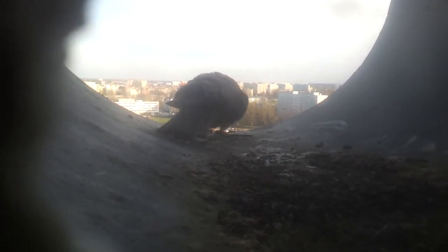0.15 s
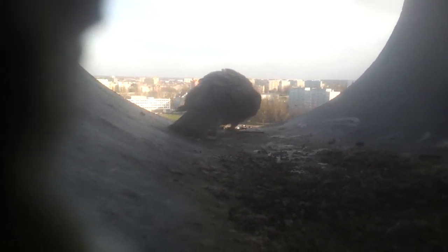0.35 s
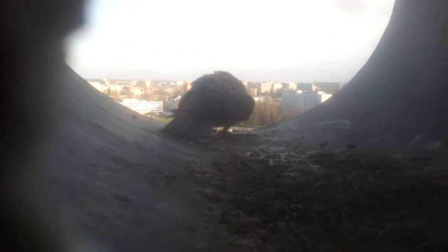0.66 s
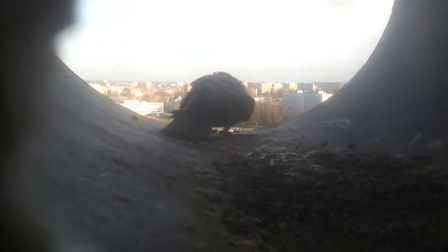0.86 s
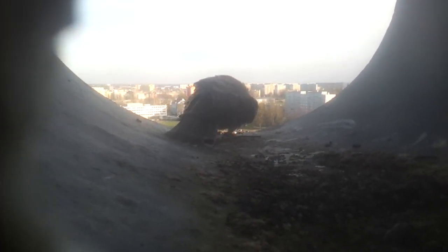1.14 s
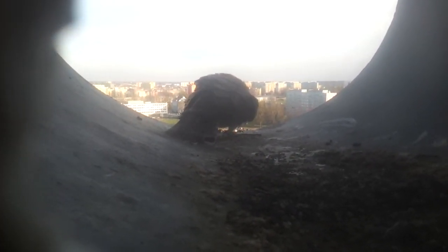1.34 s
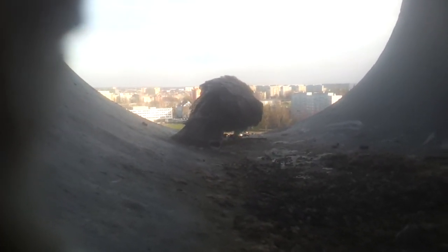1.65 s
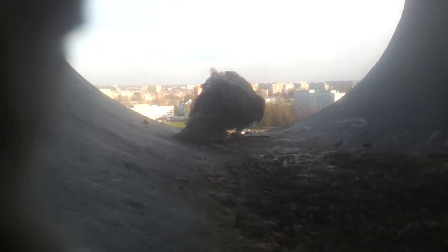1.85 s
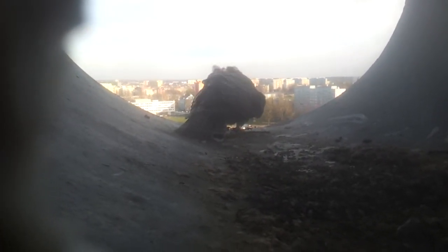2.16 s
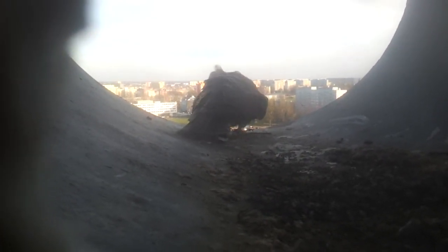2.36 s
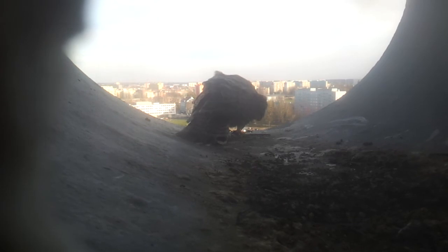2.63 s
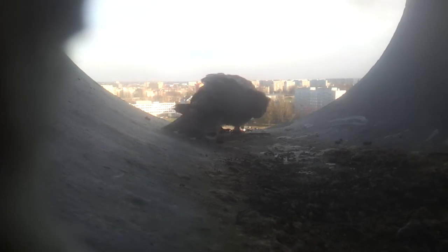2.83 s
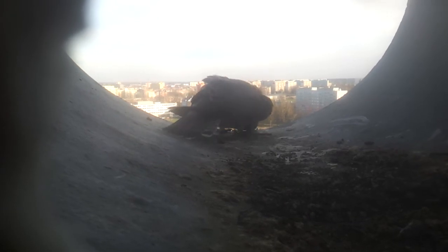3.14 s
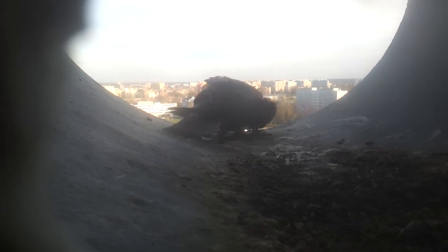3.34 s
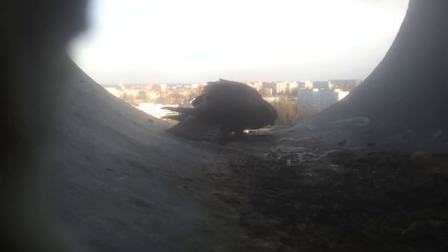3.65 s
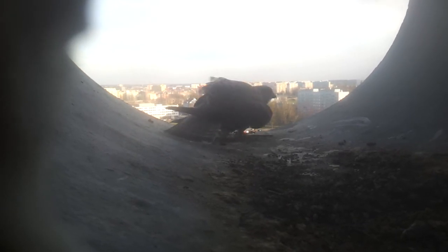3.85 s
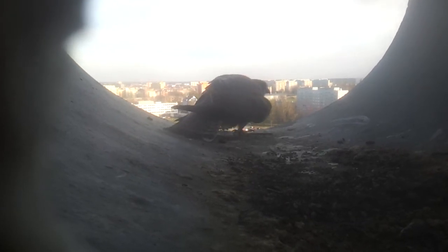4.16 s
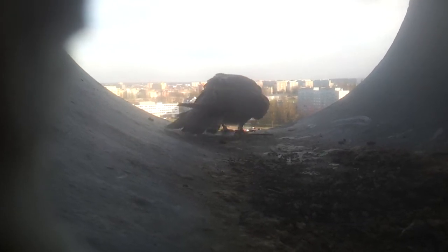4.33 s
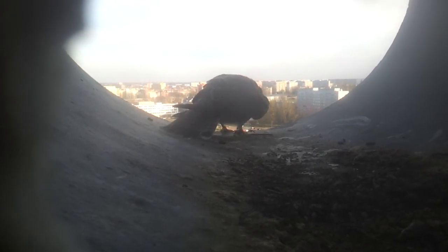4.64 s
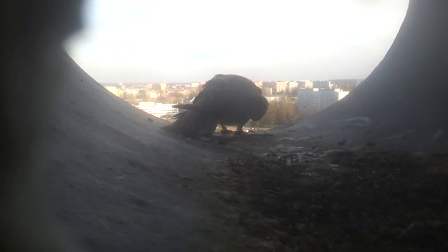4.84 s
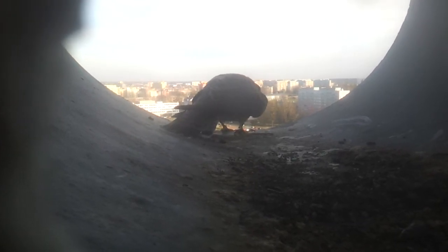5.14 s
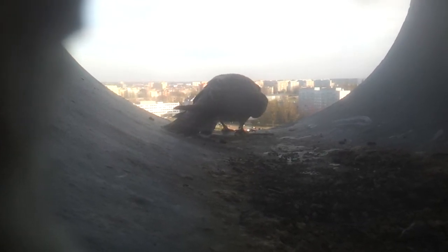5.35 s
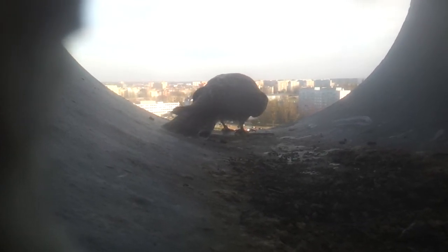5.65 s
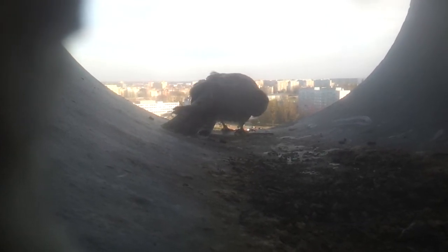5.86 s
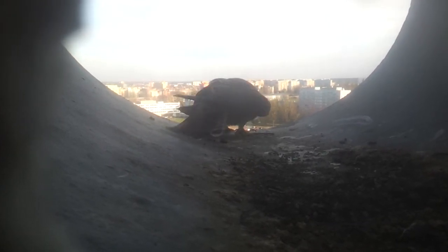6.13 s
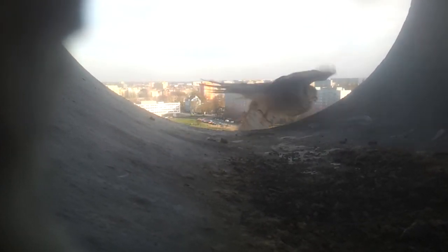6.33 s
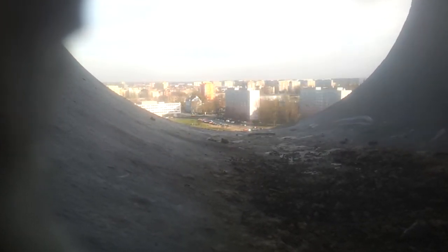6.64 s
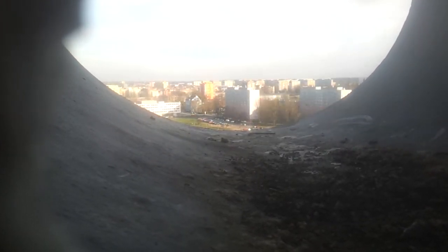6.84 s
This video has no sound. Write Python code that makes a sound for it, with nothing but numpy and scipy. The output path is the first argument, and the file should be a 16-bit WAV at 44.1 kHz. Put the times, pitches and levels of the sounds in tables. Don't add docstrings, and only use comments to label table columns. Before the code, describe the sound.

Inside a concrete pipe high over a town, steady muffled traffic rumble, a deep faint hum and light microphone hiss run throughout. A tiny dry grit tick comes at 0.2 s and a weak chirp near 0.6 s. A nearby kestrel then gives shrill, quavering trills of about seventeen notes a second, each note leaping up and sagging: calls at 0.7-1.1, 1.3-1.7, 1.8-2.2 and 2.4-2.7 s, growing stronger, then a lone chirp near 2.9 s. Thin whistles from another bird far off sound around 0.7 and 2.7 s. Only the rumble and a barely audible tick at 3.4 s fill the pause. The second, louder run opens with a long swelling trill at 4.3-4.8 s, followed by calls at 4.9-5.3 and 5.4-5.7 s, a more irregular one at 6.1-6.5 s, and a fainter last trill from 6.7 s to the end. Pipe and buildings return short, bright echoes.

```python
import sys
import numpy as np
from scipy import signal
from scipy.fft import rfft, irfft, next_fast_len
from scipy.io import wavfile
from scipy.ndimage import uniform_filter1d, minimum_filter1d, map_coordinates

SR = 44100
rng = np.random.default_rng(int(sys.argv[2]) if len(sys.argv) > 2 else 0)


def gain_from_db(level_db):
    decades = np.asarray(level_db, float) / 20
    return 10 ** decades


def materialize(psi):
    bounded = np.clip(np.atleast_2d(psi).T, -1, 1)
    quanta = np.round(bounded * 32767).astype(np.int16)
    wavfile.write(sys.argv[1], SR, quanta)


N = 308259

# frequency in Hz, density in dB per Hz.
DRONE_COLOUR = [(12, -57), (20, -22), (31, -7), (43, -4.5), (59, 1.5), (75, -5.5), (85, -18), (110, -15),
                (190, -120)]
RUMBLE_COLOUR = [(41, -21), (70, -2), (76, -3), (102, 2), (124, -4.5), (189, -5.5), (221, -5), (237, -15),
                 (253, -12), (290, -13.5), (380, -25), (640, -120)]
TRAFFIC_COLOUR = [(150, -33), (250, -3.5), (306, -11), (352, 4.5), (379, -5.5), (459, 0), (500, -5.5),
                  (600, -2.5), (742, -5.5), (919, 0.5), (1670, -7), (1960, -11), (3200, -21), (4160, -70),
                  (7040, -120)]
HISS_COLOUR = [(1470, -5.5), (2500, -8.5), (3240, -5.5), (4040, -1.5), (4790, -4), (5940, -3.5),
               (14600, -8)]
SHAKE_COLOUR = [(14, -25), (24, -10), (32, 13), (42, -13), (80, -120)]
# time in seconds, level in dB.
TRAFFIC_FLOW = [(0, -48), (1.9, -46.5), (3, -48), (4.5, -48.5), (6.99, -51)]
# frequency in Hz, left-right likeness from -1 to 1.
STEREO_LIKENESS = [(60, 0.91), (130, 0.98), (290, 0.87), (620, 0.65), (1360, -0.37), (2980, 0.031),
                   (6500, -0.34), (14200, -0.27)]
# frequency in Hz, left over right in dB.
STEREO_LEAN = [(60, 5.5), (110, 3.5), (200, 3), (370, 2), (680, -0.5), (1250, -2.5), (2300, 0.5),
               (4210, 0.5), (7740, -1), (14200, 0.5)]
# frequency in Hz, level in dB.
MACHINE_HUM = (45, -53)
# frequency in Hz, time to fall by 60 dB in seconds.
WALL_DECAY = [(1500, 0.57), (3500, 0.57), (7000, 0.44), (12000, 0.67)]
# time in seconds, peak in dB.
GRIT_TICKS = [
    (0.2278, -27),
    (3.3994, -43),
]
# time in seconds, pitch in Hz, level in dB.
FAR_WHISTLES = [
    [(2.698, 2420, -32), (2.73, 2330, -44), (2.77, 2240, -47), (2.81, 2270, -56), (2.85, 2090, -46),
     (2.865, 2150, -56)],
    [(.755, 3600, -51), (.78, 3630, -42), (.815, 3500, -55)],
    [(.655, 4850, -65), (.677, 4500, -45), (.695, 4380, -60)],
]
# multiple of the pitch, level in dB.
UPPER_PARTIALS = [(3, -4.5), (4, -4), (5, -18), (6, -32.5), (7, -33), (8, -58)]
# frequency in Hz, gain in dB.
THROAT_COLOUR = [(4000, 1), (4700, 3.5), (5400, 0), (5900, -7), (6600, 4.5), (7200, 0.5), (8000, 0.5),
                 (12000, 2)]
# pitch in Hz, level in dB.
FUNDAMENTAL_COLOUR = [(1360, 8), (1470, -11), (1580, 1), (1660, -8.5), (1750, -9.5), (1850, -12.5)]
# opening note, first beat, last beat and end in seconds,
# beak turned (left over right) in dB.
CALL_TIMES = [(0.72, 0.775, 1.06, 1.11, -2), (1.293, 1.366, 1.6, 1.66, -1.5),
              (1.8, 1.83, 2.052, 2.174, -0.5), (2.414, 2.449, 2.62, 2.712, -0.5),
              (4.265, 4.311, 4.711, 4.764, -3), (4.915, 4.984, 5.218, 5.277, -2.5),
              (5.423, 5.486, 5.66, 5.73, -2.5), (6.138, 6.194, 6.246, 6.52, -2),
              (6.69, 6.756, 6.927, 6.984, -0.5)]
# opening pitch and top pitch in Hz, opening level and top
# level in dB, pace of the build in notes.
CALL_BUILDS = [(1509.5, 1725, -40.5, -31.5, 2.52), (1583, 1790, -46, -30, 1.57),
               (1608, 1840, -46, -26.5, 1.84), (1522, 1750, -42.5, -27, 1.78),
               (1410, 1800, -47.5, -19, 3.68), (1699, 1840, -32, -20, 4.3), (1724, 1772, -27.5, -22, 3.36),
               (1480, 1590, -46, -37.5, 0.76), (1500, 1730, -51, -40, 0.726)]
# share of pitch lost in early notes, share lost in late notes,
# upper partials in dB, fundamental in dB.
CALL_VOICES = [(.09, 0.052, 2, 0), (0.074, 0.083, -0.5, -2), (0.07, 0.08, -2, -1),
               (0.052, 0.0613, -3.5, -1), (0.062, 0.009, 1.5, 4), (0.099, 0.075, 0, 3.5),
               (0.0346, 0.0444, -2.5, -1), (.04, 0.075, 4, 1), (0.042, .045, -3.5, -6)]
# start in seconds, held pitch and sagged pitch in Hz,
# level in dB, upper partials in dB.
STRAY_NOTES = [(0.556, 1387, 1400, -54.5, 3), (0.679, 1730, 1490, -42, -5), (.947, 1545, 1480, -33.5, -1),
               (2.108, 1948, 2030, -23, -14), (2.133, 1813, 1530, -26.5, -1.5),
               (2.689, 1530, 1344, -28, -2), (2.858, 1540, 1450, -24, -6), (2.873, 1750, 1790, -34.5, -9),
               (2.883, 1616, 1410, -35.5, -4), (4.238, 1480, 1410, -65, -9), (6.3, 1534, 1520, -21.5, -1),
               (6.33, 1587, 1550, -33.5, 3), (6.392, 1613, 1592, -29.5, -1), (6.441, 1628, 1330, -33, -5.5)]
# end in seconds, beak turned (left over right) in dB.
LONE_CHIRPS = [
    (.61, 5),
    (2.91, -1.5),
]

BEAT_S = 0.057
FLUTTER_DB = 2.4


def unit(x):
    return x / np.sqrt(np.mean(x ** 2) + 1e-20)


def to_db(power):
    return 10 * np.log10(np.abs(power) + 1e-20)


def along(points, hz):
    f, v = np.transpose(points)
    return np.interp(np.log(hz + 1), np.log(f + 1), v)


def wobble(rate, size=N):
    knots = rng.standard_normal(int(size * rate / SR) + 4)
    return map_coordinates(knots, [np.arange(size) * rate / SR])


def glide(hz):
    return 2 * np.pi * np.cumsum(hz, axis=-1) / SR


def add(track, sound, s):
    part = track[:, round(s * SR):][:, :sound.shape[1]]
    part += sound[:, :part.shape[1]]


def rush(colour, patchy_db):
    z = signal.stft(rng.standard_normal((2, N + SR)), nperseg=512)[2]
    patches = uniform_filter1d(rng.standard_normal(z.shape[1:]), size=5, axis=0)
    patches = uniform_filter1d(patches, size=12, axis=1)
    noise = signal.istft(z * gain_from_db(patchy_db * unit(patches)), nperseg=512)[1]
    size = next_fast_len(N + SR // 2)
    hz = np.fft.rfftfreq(size, 1 / SR)
    turn = np.arccos(np.clip(along(STEREO_LIKENESS, hz), -1, 1)) / 2
    mid, side = rfft(noise[:, :size]) * [np.cos(turn), np.sin(turn)]
    lean = gain_from_db(np.outer([.5, -.5], along(STEREO_LEAN, hz)))
    both = irfft([mid + side, mid - side] * lean * gain_from_db(along(colour, hz)), size)[:, :N]
    return both / np.sqrt(np.mean(both.mean(0) ** 2))


def walls(far_db):
    hz, t, z = signal.stft(rng.standard_normal((2, SR // 2)), SR, nperseg=256)
    fall = gain_from_db(-60 * t / along(WALL_DECAY, hz)[:, None])
    tail = signal.istft(z * fall, SR, nperseg=256)[1]
    tail *= np.clip(np.arange(tail.shape[1]) / (0.004 * SR), 0, 1)
    tail *= gain_from_db(far_db) / np.linalg.norm(tail[0])
    delay, sign = rng.random((2, 2, 8))
    for side in (0, 1):
        at = (20 + delay[side] ** 2 * 0.03 * SR).astype(int)
        tail[side, at] += gain_from_db(-12) * np.sign(sign[side] - .5)
    tail[[0, 1], [16, 0]] += 1
    return tail


def town():
    flow_db = np.interp(np.arange(N) / SR, *np.transpose(TRAFFIC_FLOW)) + 0.82
    drone = gain_from_db(-41.5) * rush(DRONE_COLOUR, patchy_db=0.0)
    rumble = gain_from_db(-40.5) * rush(RUMBLE_COLOUR, patchy_db=1.28)
    traffic = gain_from_db(flow_db) * rush(TRAFFIC_COLOUR, patchy_db=0.93)
    hiss = gain_from_db(-56.5) * rush(HISS_COLOUR, patchy_db=2.0)
    return drone + rumble + traffic + hiss


def machinery():
    hz, db = MACHINE_HUM
    hum = gain_from_db(db + 3.0 * wobble(3.9)) * np.sin(glide(hz + 2.5 * wobble(4.4)))
    shake = gain_from_db(-57) * rush(SHAKE_COLOUR, patchy_db=-8.0)
    return hum * gain_from_db([[2.5], [-2.5]]) + shake


def grit():
    out, t = np.zeros((2, N)), np.arange(400) / SR
    for s, db in GRIT_TICKS:
        jumble = np.sin(glide(rng.uniform(2300, 9600, (1, len(t)))))
        add(out, gain_from_db(db - 60 * t / 0.0012) * jumble * [[1], [1]], s)
    return out


def far_bird():
    out = np.zeros((2, N))
    for rows in FAR_WHISTLES:
        s, hz, db = np.transpose(rows)
        t = np.arange(s[0], s[-1], 1 / SR)
        phase = glide(np.interp(t, s, hz))
        tone = np.sin(phase) + gain_from_db(-13) * np.sin(2 * phase)
        tone *= signal.windows.tukey(len(t), .2)
        tone *= gain_from_db(np.interp(t, s, db) + FLUTTER_DB * wobble(60, size=len(t)))
        add(out, signal.fftconvolve(tone[None], walls(far_db=-1.0), axes=1), s[0])
    return out


def note(length, held_hz, sagged_hz, bright_db, low_db, first, last):
    t = np.arange(round(length * SR)) / SR
    share, sag_at, sag_fall, sag_back = t / length, 0.62, 0.1, 0.3
    if last:
        sag = np.clip(1 - (length - t) / 0.0243, 0, 1) ** 1.22
    else:
        sag = np.exp(-((share - sag_at) / np.where(share < sag_at, sag_fall, sag_back)) ** 2)
    if first:
        leap = -(.15 if sagged_hz < held_hz else .04) * np.exp(-t / 0.0073)
    else:
        leap = -.06 * np.exp(-t / 0.0017) + 0.052 * np.exp(-t / 0.0048)
    steady = held_hz * (1 + leap + 0.0055 * wobble(195.0, size=len(t)))
    phase = glide(steady + (sagged_hz - held_hz) * sag)
    rise = 1 - np.exp(-t / (.014 if first else .003))
    stop = 1 - np.exp((t - length) / 0.0037)
    tired = np.clip((share - sag_at) / sag_fall / 2 + 1, 0, 1)
    effort = rise * stop * gain_from_db(-13 * sag if last else -11 * tired)
    effort *= gain_from_db(1.8 * wobble(443, size=len(t)))
    levels = [(1, low_db), (2, 0)]
    levels += [(k, db + bright_db + along(THROAT_COLOUR, k * held_hz)) for k, db in UPPER_PARTIALS]
    voice = 0
    for k, db in levels:
        voice = voice + gain_from_db(db + FLUTTER_DB * wobble(85, size=len(t))) * np.sin(k * phase)
    return effort * voice


def trill(timing, build, voice):
    opening_s, first_s, last_s, end_s, _ = timing
    opening_hz, top_hz, opening_db, top_db, pace = build
    early_sag, late_sag, bright_db, low_db = voice
    beats = round((last_s - first_s) / BEAT_S) + 1
    s = np.append(opening_s, np.linspace(first_s, last_s, beats))
    effort = 1 - np.exp(-np.arange(len(s)) / pace)
    effort = effort / effort[-1]
    hz = opening_hz + (top_hz - opening_hz) * effort
    db = opening_db + (top_db - opening_db) * effort
    sag = np.interp(s, s[[1, -2]], [early_sag, late_sag])
    sag[0] *= opening_db > -36
    if end_s - last_s < 1.25 * BEAT_S:
        sag[-1] = 0.145
        db[-1] -= 3.5
    return np.transpose([s, hz, hz * (1 - sag), db, 0 * s + bright_db, 0 * s + low_db])


def kestrel():
    out, stray = np.zeros((2, N)), np.pad(STRAY_NOTES, [(0, 0), (0, 1)])
    beats = np.vstack([trill(*rows) for rows in zip(CALL_TIMES, CALL_BUILDS, CALL_VOICES)])
    kept = np.abs(beats[:, :1] - stray[:, 0]).min(1) > .01
    notes = np.vstack([beats[kept], stray])
    notes = notes[np.argsort(notes[:, 0])]
    ends, pan_db = np.transpose(sorted(LONE_CHIRPS + [row[3:] for row in CALL_TIMES]))
    call = np.searchsorted(ends, notes[:, 0])
    last = np.diff(call, append=N) > 0
    stops = np.where(last, ends[call], np.roll(notes[:, 0], -1) + 0.0056)
    spaces = [walls(far_db=-5) * gain_from_db([[db / 2], [-db / 2]]) for db in pan_db]
    for i, (s, held_hz, sagged_hz, db, upper_db, under_db) in enumerate(notes):
        push_db = db + 30
        bright_db = upper_db - 5.5 - 0.17 * push_db
        low_db = under_db + along(FUNDAMENTAL_COLOUR, held_hz) - 0.64 * push_db
        voice = note(stops[i] - s, held_hz, sagged_hz, bright_db, low_db, last[i - 1], last[i])
        add(out, signal.fftconvolve(gain_from_db(db) * voice[None], spaces[call[i]], axes=1), s - .002)
    return out


def scene():
    return town() + machinery() + grit() + far_bird() + kestrel()


def thinned(x):
    hz, _, z = signal.stft(x, SR, nperseg=1024)
    raw = np.abs(z) ** 2
    power = uniform_filter1d(raw, size=7, axis=1)
    level = to_db(power)
    loud_db = to_db(uniform_filter1d(power.max(0), size=5, axis=1))
    loud_db[hz < 2700] = -400
    tilt = .36 * hz[:, None] / 1000
    threshold = np.maximum.accumulate(.35 * loud_db + tilt, axis=0) - tilt - 62.5
    near = -minimum_filter1d(-loud_db, size=24, axis=0, origin=11) - 33
    lone = to_db(uniform_filter1d(raw, size=3, axis=2)) > threshold + 1.5
    passed = ((level > threshold) | lone) & (level > near)
    return signal.istft(z * passed, SR, nperseg=1024)[1][:, :N]


def roll_off(x):
    return signal.sosfilt(signal.butter(12, 14800, fs=SR, output="sos"), x)


def record(dry):
    band = signal.sosfiltfilt(signal.butter(16, 14600, fs=SR, output="sos"), dry)
    mix = thinned(band)
    return roll_off(mix)


dry = scene()
out = record(dry)
materialize(out)
```